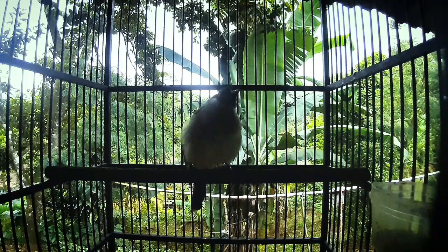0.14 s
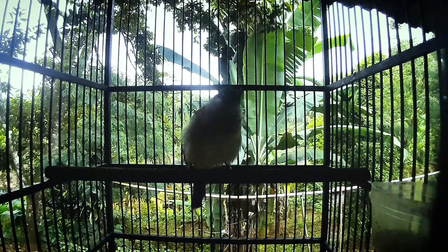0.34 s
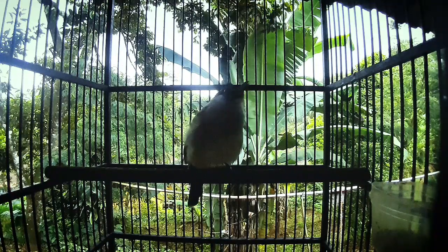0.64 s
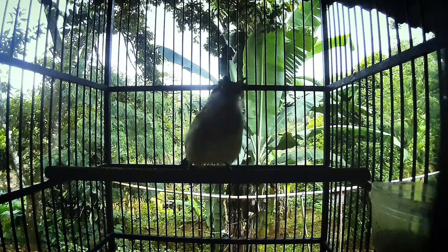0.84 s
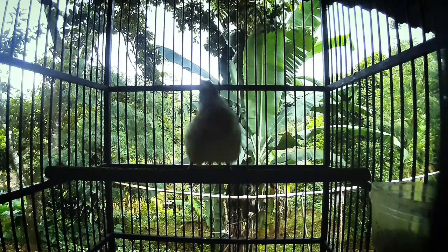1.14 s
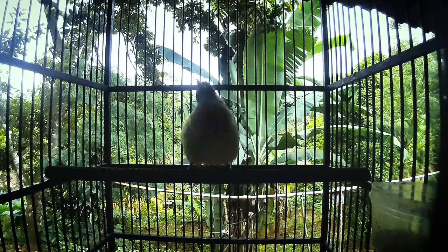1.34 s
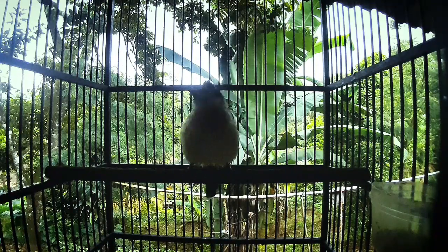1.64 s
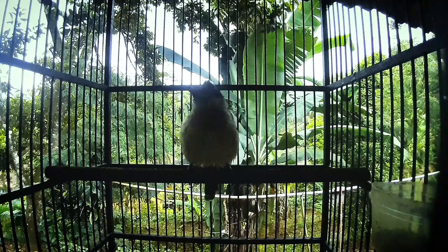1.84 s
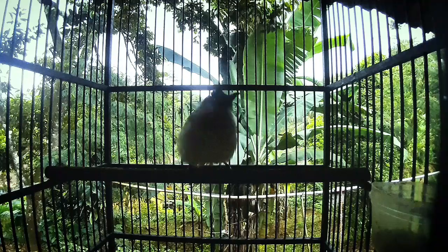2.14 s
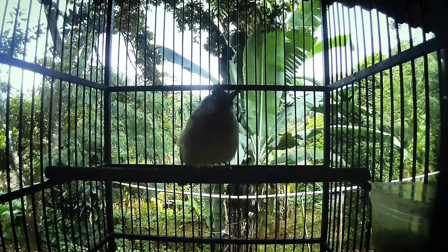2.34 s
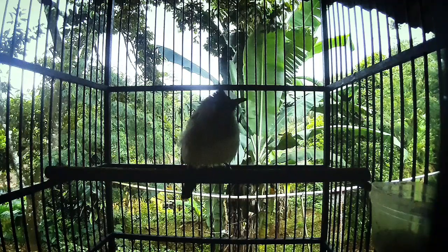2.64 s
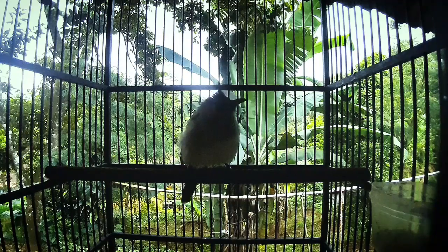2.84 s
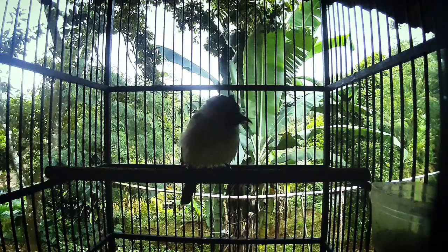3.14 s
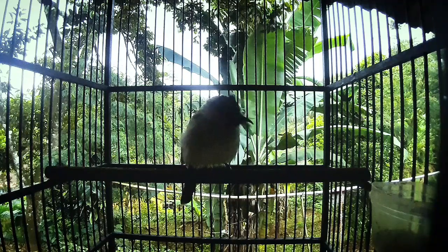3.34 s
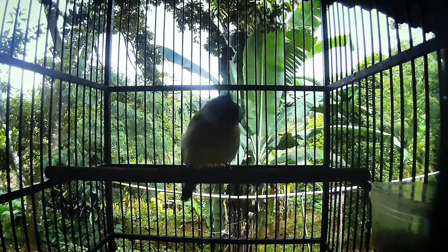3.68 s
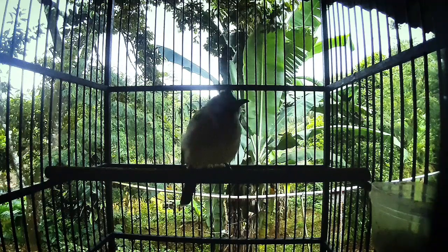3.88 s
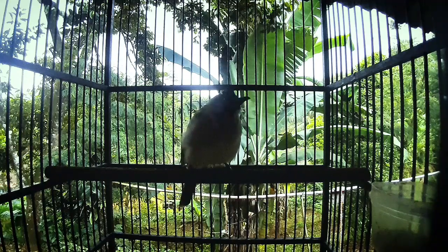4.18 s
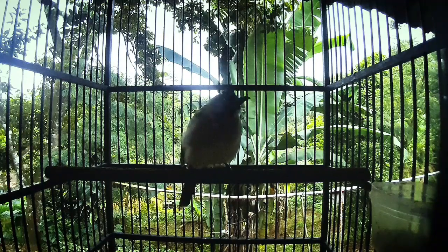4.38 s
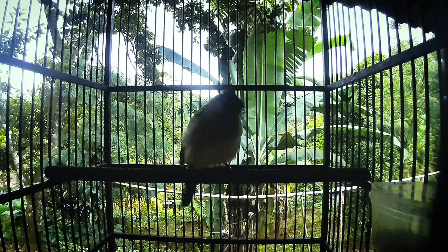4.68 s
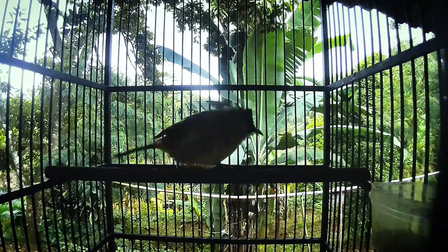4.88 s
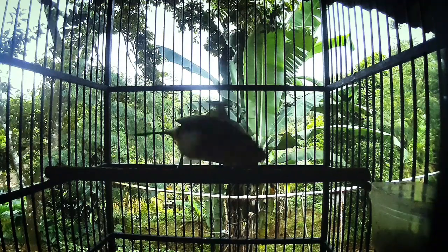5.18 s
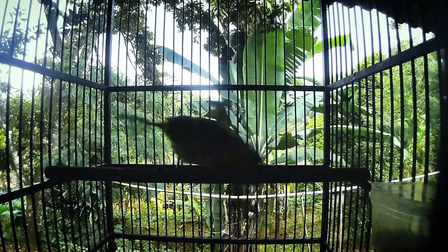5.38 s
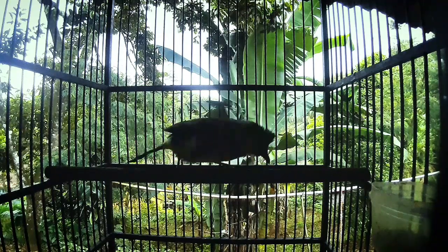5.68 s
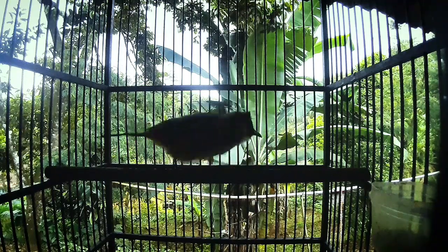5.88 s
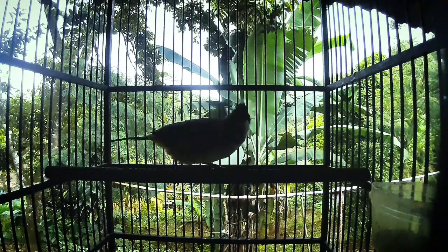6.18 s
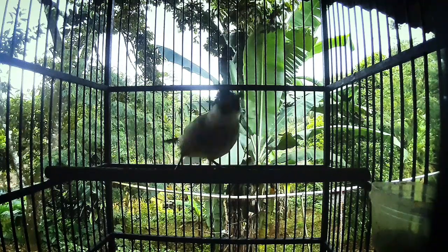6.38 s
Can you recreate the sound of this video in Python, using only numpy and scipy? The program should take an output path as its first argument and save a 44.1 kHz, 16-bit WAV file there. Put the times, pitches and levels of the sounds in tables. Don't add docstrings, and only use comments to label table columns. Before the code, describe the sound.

A caged bird close by gives a buzz and a loud, rich whistled phrase, then hops and claw ticks, as distant birds answer in a hissing garden.

```python
import sys
import numpy as np
from scipy import signal
from scipy.fft import rfft, irfft
from scipy.io import wavfile
from scipy.ndimage import uniform_filter1d

SR = 44100
rng = np.random.default_rng(int(sys.argv[2]) if len(sys.argv) > 2 else 0)


def inscribe(sig):
    pcm = np.round(np.clip(np.atleast_2d(sig).T, -1, 1) * 32767)
    wavfile.write(sys.argv[1], SR, pcm.astype(np.int16))


def how_loud(loudness_db):
    steps = np.asarray(loudness_db, float) / 20
    return 10 ** steps


N = 287532
LEAD = SR // 2
M = N + LEAD


def rms_one(x):
    return x / np.sqrt(np.mean(x ** 2) + 1e-20)


def at_hz(points, hz):
    table_hz, value = np.transpose(points)
    return np.interp(np.log(hz + 1), np.log(table_hz), value)


def drift(rate_hz, size):
    r = np.exp(-2 * np.pi * rate_hz / SR)
    run_in = int(SR / rate_hz)
    noise = rng.standard_normal(size + run_in)
    return rms_one(signal.lfilter([1], [1, -2 * r, r * r], noise)[run_in:])


def resonate(x, hz, width_hz):
    r = np.exp(-np.pi * width_hz / SR)
    poles = [1, -2 * r * np.cos(2 * np.pi * hz / SR), r * r]
    return signal.lfilter([(1 - r * r) / 2, 0, (r * r - 1) / 2], poles, x)


def add(track, piece, start_s):
    i = LEAD + round(start_s * SR)
    track[i:i + len(piece)] += piece[:M - i]


# frequency in Hz, correlation (1 = identical).
STEREO_LIKENESS = [(60, 1), (130, 0.66), (290, .85), (640, 0.19), (1400, 0.012), (15000, 0.043)]


def coloured(spectrum):
    hz = np.fft.rfftfreq(N, 1 / SR)
    mid, side = rfft(rng.standard_normal((2, N))) * how_loud(at_hz(spectrum, hz))
    alike = np.clip(at_hz(STEREO_LIKENESS, hz), -1, 1)
    return rms_one(irfft(np.sqrt(1 + alike) * mid + np.sqrt(1 - alike) * side * [[1], [-1]], N))


def echoes(x, t60_s, build_up_s, damp_hz, direct_db=-60):
    t = np.arange(SR * 3 // 4) / SR
    response = rng.standard_normal((2, len(t))) * how_loud(-60 * t / t60_s) * (1 - np.exp(-t / build_up_s))
    response = signal.sosfilt(signal.butter(1, damp_hz, fs=SR, output="sos"), response)
    response /= np.sqrt(np.sum(response ** 2) / 2)
    response[[0, 1], [0, 13]] += how_loud(direct_db) * np.array([1, .6])
    return signal.fftconvolve(x[None], response, axes=1)[:, LEAD:M]


# frequency in Hz, gain in dB.
LEFT_EAR = [(1000, -2.5), (4200, 2.5), (7400, 4), (8500, -5), (10300, -4.5), (12000, 12), (14500, 3.5),
            (15800, -7)]
RIGHT_EAR = [(1000, -1.5), (2400, -7.5), (2900, -9.5), (3600, -0.5), (5000, -6), (7400, -3.5),
             (8500, -12.5), (10300, -17), (12000, -1), (15800, -11.5)]


def ears(x):
    right_lag_s = 0.00011
    hz = np.fft.rfftfreq(M, 1 / SR)
    left = how_loud(at_hz(LEFT_EAR, hz))
    right = how_loud(at_hz(RIGHT_EAR, hz)) * np.exp(-2j * np.pi * hz * right_lag_s)
    return irfft(rfft(x) * np.array([left, right]), M)[:, LEAD:]


# multiple of the engine's turning rate, level in dB.
ENGINE_ORDERS = [(2, -11.5), (2.94, 9), (4, -11.5), (5, 7.5), (6, 5.5), (7.04, 7.5), (8, -10), (9, -6),
                 (11, -6.5)]


def engine():
    turn_hz = 27.3 * (1 + .004 * drift(.8, N))
    turn = 2 * np.pi * np.cumsum(turn_hz) / SR
    out = np.zeros(N)
    for order, db in ENGINE_ORDERS:
        phase = order * turn + 0.95 * drift(1.1, N) + rng.uniform(0, 2 * np.pi)
        out += how_loud(db + 1.8 * drift(2.0, N)) * np.sqrt(2) * np.sin(phase)
    return out


# frequency in Hz, density in dB per Hz.
RUMBLE_SPECTRUM = [(26, -39.5), (45, -13.5), (70, -7), (187, -3), (213, -10), (240, -14.5), (286, -9),
                   (351, -15.5), (471, -15), (622, -27), (1500, -50), (1950, -77.5), (3300, -120)]


def hum():
    return how_loud(6) * coloured(RUMBLE_SPECTRUM) + how_loud(-3) * engine()


# centre in Hz, width in Hz, level
# in dB, throb rate in Hz.
NARROW_BANDS = [(950, 140, -19.5, 20), (6100, 290, -15, 60), (7280, 610, -9, 100), (10340, 1100, 1, 200)]


def insects():
    out = np.zeros((2, N))
    for hz, width_hz, db, throb_hz in NARROW_BANDS:
        band = resonate(resonate(rng.standard_normal((2, N)), hz, width_hz), hz, width_hz)
        throb_db = 0.5 * drift(throb_hz, N) + 0.75 * drift(3.08, N)
        out += how_loud(db + throb_db) * rms_one(band)
    return out


# frequency in Hz, density in dB per Hz.
AIR_SPECTRUM = [(410, -51), (700, -18), (900, -11.5), (1100, -20), (2500, -23.5), (4100, -24), (6150, -9.5),
                (6740, -12.5), (7390, -7.5), (8420, -27.5), (10300, -0.5), (11600, -23.5), (13300, -45.5),
                (15700, -30)]


def hiss():
    side_phase = np.array([[0], [2.1]])
    whine = how_loud(-3) * np.sin(2 * np.pi * 15626 * np.arange(N) / SR + side_phase)
    return how_loud(1.5) * coloured(AIR_SPECTRUM) + insects() + whine


# time in seconds, level in dB.
GAIN_CURVE = [(0.0, -61.5), (0.36, -62), (0.52, -64), (0.87, -66.5), (0.96, -71.5), (1.12, -72.5),
              (2.9, -74.5), (3.54, -70), (4.01, -65), (4.32, -62), (5.03, -61.5), (5.39, -63), (5.72, -62),
              (6.06, -63), (6.52, -61.5)]


def background():
    s, db = np.transpose(GAIN_CURVE)
    hiss_db = np.interp(np.arange(N) / SR, s, db)
    hum_db = -60 + 1.184 * (hiss_db + 62)
    return (how_loud(hiss_db) * hiss() + how_loud(hum_db) * hum()) * how_loud([[1.3], [-1.3]])


# frequency in Hz, density in dB per Hz.
RUSH_SPECTRUM = [(350, -15.5), (600, -4), (950, 2), (1250, -9.5), (1800, -2), (2600, -15), (4000, -20),
                 (9000, -56)]


def rush():
    peak_s, peak_db, rise_s = 2.067, -57, 0.19
    t = np.arange(N) / SR - peak_s
    rise = np.clip(1 + t / rise_s, 0, 1)
    after_s = t.clip(0)
    fall_db = np.maximum(-70 * after_s, -6.5 - 38 * after_s)
    return rise * how_loud(peak_db + fall_db) * coloured(RUSH_SPECTRUM)


# start in seconds, peak in dB.
BAR_PINGS = [
    (5.15, -50),
    (5.375, -45),
    (5.415, -46),
    (5.76, -43),
    (5.833, -37),
]
# start in seconds, peak in dB, t60 in seconds.
PERCH_KNOCKS = [
    (5.359, -53, .2),
    (5.507, -38, 0.036),
    (5.758, -40.5, 0.15),
    (6.10, -47, .14),
]
# start in seconds, peak in dB, centre in Hz, t60 in seconds.
BEAK_SNAPS = [
    (3.92, -63.5, 13100, .005),
    (4.680, -32.5, 15300, 0.0055),
    (5.282, -35.5, 4052, 0.013),
]
# frequency in Hz, level in dB, t60 in seconds.
PERCH_MODES = [(409.4, -9.5, 0.13), (1400, -15, 0.074), (5140, -9, 0.027)]


def cage():
    out, t = np.zeros(M), np.arange(SR // 5) / SR
    wood = np.zeros(len(t))
    for hz, db, t60_s in PERCH_MODES:
        wood += how_loud(db - 60 * t / t60_s) * np.sin(2 * np.pi * hz * t)
    ticks = [(s, db, 8780, 520, 0.038, 0) for s, db in BAR_PINGS]
    ticks += [(s, db, hz, 5800, t60_s, 0) for s, db, hz, t60_s in BEAK_SNAPS]
    for s, db, t60_s in PERCH_KNOCKS:
        ticks += [(s, db, 1240, 3100, t60_s, 1), (s, db - 10, 646, 400, 3.4 * t60_s, 0)]
    for s, db, hz, width_hz, t60_s, wood_share in ticks:
        burst = rng.standard_normal(len(t)) * how_loud(-60 * t / t60_s)
        crack = resonate(resonate(burst, hz, width_hz), hz, width_hz)
        add(out, how_loud(db) * (crack / np.abs(crack).max() + wood_share * wood), s)
    return ears(out) + how_loud(-9) * echoes(out, .2, .003, 9000)


def syrinx(half_hz, partials_db, flicker_db):
    phase = 2 * np.pi * np.cumsum(half_hz) / SR
    out = np.zeros(len(phase))
    for k, db in enumerate(partials_db, 1):
        level = np.sqrt(2) * how_loud(db + flicker_db * np.log2(k / 2) * drift(57, len(phase)))
        out += level * np.sin(k * phase + k * k) * (k * half_hz < 17000)
    return out


def buzzes(rows, partials_db, swing_hz, rasp, arch, warble_hz, scoop, round_top):
    throat_hz, throat_width_hz = 2020, 300
    out = np.zeros(M)
    for start_s, span_s, centre_hz, db in rows:
        t = np.arange(round(span_s * SR)) / SR
        arc = np.sin(np.pi * t / span_s)
        onset = 1 / (1 + np.exp(-(t - .017) / 0.0016))
        warble = np.sin(2 * np.pi * np.cumsum(warble_hz * (1 + .1 * drift(50, len(t)))) / SR)
        bend = arch * (arc - .6) - scoop * (1 - onset) * (1 - t / 0.028)
        hz = centre_hz * (1 + bend) + swing_hz * (onset * warble + rasp * drift(377, len(t)))
        strength = arc ** round_top * how_loud(12 * rasp * np.tanh(drift(300, len(t))) + 0.87 * onset)
        strength *= how_loud(-4 * np.minimum(((hz - throat_hz) / throat_width_hz) ** 2, 2))
        add(out, how_loud(db) * strength * syrinx(hz, partials_db, flicker_db=-0.46), start_s)
    return out


def whistle(track, rows, partials_db, waver):
    s, hz, db = np.transpose(rows)
    t = s[0] + np.arange(round((s[-1] - s[0]) * SR)) / SR
    hz = uniform_filter1d(np.interp(t, s, hz), size=60) * (1 + waver * drift(38, len(t)))
    strength = uniform_filter1d(np.interp(t, s, how_loud(db)), size=60, mode="constant")
    edge_s = .003
    edge = np.clip(np.minimum(t - s[0], s[-1] - t) / edge_s, 0, 1)
    strength *= np.sin(np.pi / 2 * edge) ** 2
    breath = how_loud(-53.5) * rms_one(resonate(rng.standard_normal(len(t)), 1210, 1500))
    note = syrinx(hz / 2, [-200, partials_db[1]], flicker_db=0)
    overtones = syrinx(hz / 2, partials_db, flicker_db=2.2) - note
    pressed = (strength / strength.max()) ** 0.2
    add(track, strength * (note + pressed * overtones + breath), s[0])


def slide(track, start_s, span_s, first_hz, goal_hz, glide_s, db):
    size = round(span_s * SR) + 1
    t = np.arange(size) / SR
    hz = goal_hz + (first_hz - goal_hz) * np.exp(-t / glide_s)
    hz = uniform_filter1d(hz, size=90) * (1 + 0.013 * drift(49, size))
    place = np.clip(t / span_s, 0, 1) ** (np.log(.5) / np.log(.45))
    strength = how_loud(db) * np.abs(np.sin(np.pi * place)) ** 0.37
    add(track, strength * syrinx(hz / 2, [-70, 0], flicker_db=1.4), start_s)


# start in seconds, peak in dB.
FAR_PIPS = [
    (0.312, -64),
    (2.441, -72),
    (3.494, -75),
    (4.559, -62.5),
]
# start in seconds, length in seconds, first pitch in Hz, peak in dB.
FAR_FALLS = [
    (3.055, 0.13, 4160, -74),
    (3.456, 0.14, 4615, -69.5),
    (3.852, 0.15, 4650, -64.5),
    (4.242, 0.14, 4806, -58.5),
]
# start in seconds, length in seconds, first pitch in Hz, peak in dB.
FAR_HOLDS = [
    (-.1, 0.65, 1482, -73),
    (3.016, .13, 2290, -85),
    (3.09, 0.15, 1600, -81.5),
    (5.028, .04, 5560, -61),
]


def far_slides():
    track = np.zeros(M)
    for s, db in FAR_PIPS:
        slide(track, s, .02, 6080, 4937, .04, db)
    for s, span_s, hz, db in FAR_FALLS:
        slide(track, s, span_s, hz, 1910, 0.97 * span_s, db)
    for s, span_s, hz, db in FAR_HOLDS:
        slide(track, s, span_s, hz, hz * (1 - 0.24 * span_s), span_s / 2, db)
    return echoes(track, .55, .004, 8000, direct_db=-8)


# start in seconds, length in seconds, centre in Hz, peak in dB.
SCOLD_CALLS = [
    (1.295, 0.062, 1945, -68),
    (1.425, 0.054, 1890, -65),
    (1.585, 0.074, 1990, -65),
    (1.775, 0.076, 2010, -65),
    (5.58, 0.067, 2200, -54),
    (5.885, 0.067, 2150, -51.5),
    (6.12, 0.081, 2212, -51.5),
]
SCOLD_STACK = [-16.5, 1, -5, -16, -5, -23, -15]


def far_scolds():
    scolds = buzzes(SCOLD_CALLS, SCOLD_STACK, swing_hz=255, rasp=0.793, arch=0.03, warble_hz=181.1,
                    scoop=0.0291, round_top=0.067)
    return echoes(scolds, 0.36, 0.00044, 4700)


# time from its start in seconds, pitch in Hz, effort in dB.
FAR_FIGURE = [(0, 3510, -16), (.025, 3317, -9.5), (.047, 3280, 5), (.058, 2900, -23), (.07, 2280, -7.5),
              (.09, 2280, -21)]
# start in seconds, time stretch, last note in Hz, level in dB.
FAR_ANSWERS = [
    (-.16, 0.99, 3022, -37),
    (1.985, 1, 3032, -42.5),
    (3.16, 0.99, 2984, -43),
    (4.879, 0.87, 2800, -33.5),
    (5.779, .91, 2860, -32.5),
]
# start in seconds, length in seconds, centre in Hz, peak in dB.
FAR_BUZZ_CALLS = [
    (1.80, 0.09, 2223, -66),
    (2.98, 0.076, 2124, -67),
    (4.695, 0.081, 2080, -50.5),
    (5.58, 0.099, 2050, -48),
]


def far_answers():
    track = np.zeros(M)
    last_db, rise = -3, 0.0551
    up_s = FAR_FIGURE[-1][0] + .028
    for s, stretch, last_hz, db in FAR_ANSWERS:
        last_note = [(up_s, last_hz * (1 - rise), last_db),
                     (up_s + 0.0603, last_hz * (1 + rise), last_db - 7.5)]
        figure = list(FAR_FIGURE) + last_note
        rows = [(s + a * stretch, hz, effort_db + db) for a, hz, effort_db in figure]
        whistle(track, rows, [-46.5, -2.0, -74, -30], waver=.014)
    track += buzzes(FAR_BUZZ_CALLS, [-30, 6, -34, -20], swing_hz=85, rasp=.3, arch=.08, warble_hz=165.7,
                    scoop=0.06, round_top=1.3)
    return echoes(track, 0.63, 0.002, 8600, direct_db=-4.0) * how_loud([[1.9], [-1.9]])


WHISTLE_STACK = [-47.5, -0.5, -44, -32.5, -55, -39, -59, -33.5, -56, -31.5, -53.5, -44]
BUZZ_STACK = [-13.5, 1, -29, -28.5, -43.5, -52, -41.5, -46]
# start in seconds, length in seconds, centre in Hz, peak in dB.
OPENING_BUZZ = [
    (.436, 0.086, 2049, -14.5),
]
# time in seconds, pitch in Hz, effort in dB.
NOTE_STEP_DOWN = [(.688, 2970, -51.5), (.697, 3216, -24), (.7045, 3290, -15), (.7075, 2870, -14),
                  (.714, 2975, -10.5), (.722, 2924, -8.5), (.729, 3070, -22.5), (.732, 2700, -19.5)]
NOTE_LOW_HOLD = [(.732, 2990, -22.5), (.737, 2320, -19.5), (.745, 2426, -19), (.755, 2375, -11.5),
                 (.762, 2548, -9.5), (.768, 2540, -14.5), (.775, 2517, -14), (.787, 2420, -36.5)]
NOTE_WHIP = [(.830, 2206, -45.5), (.835, 2850, -12.5), (.838, 3494, -18.5), (.842, 3065, -7.5),
             (.850, 2955, -10.5), (.860, 2970, -12.5), (.868, 2931, -34)]
NOTE_HIGH_WHIP = [(.884, 2610, -45), (.892, 3440, -12.5), (.895, 3850, -17), (.899, 3850, -6),
                  (.904, 3630, -7.5), (.912, 3553, -5.5), (.937, 3570, -8), (.943, 3600, -13),
                  (.950, 3440, -43.5)]
NOTE_ARCH = [(1.013, 2880, -48.5), (1.022, 3135, -14), (1.032, 3205, -7.5), (1.044, 3220, -8),
             (1.050, 3150, -10), (1.055, 3320, -18.5), (1.063, 2700, -10.5), (1.072, 2610, -18)]
NOTE_DIP = [(1.072, 2530, -17), (1.083, 2475, -12), (1.089, 2390, -16.5), (1.092, 2410, -23),
            (1.099, 2173, -14), (1.106, 2450, -20.5), (1.115, 2460, -36)]
NOTE_SWELL = [(1.115, 2500, -36.5), (1.128, 2640, -23), (1.142, 2644, -9.5), (1.158, 2760, -10),
              (1.168, 2802, -13.5), (1.174, 2697, -14.5), (1.181, 2760, -43)]


def bulbul():
    voice = buzzes(OPENING_BUZZ, BUZZ_STACK, swing_hz=280, rasp=0.38, arch=.01, warble_hz=184.8,
                   scoop=.4, round_top=0.75)
    breaths = [NOTE_STEP_DOWN + NOTE_LOW_HOLD, NOTE_WHIP, NOTE_HIGH_WHIP, NOTE_ARCH + NOTE_DIP + NOTE_SWELL]
    for breath in breaths:
        whistle(voice, breath, WHISTLE_STACK, waver=.001)
    quick = how_loud(-22) * echoes(voice, .08, .002, 7000)
    tail = how_loud(-33.5) * echoes(voice, 0.48, 0.013, 5000)
    return ears(voice) + quick + tail


def scene():
    far_birds = far_slides() + far_scolds() + far_answers()
    return background() + rush() + cage() + far_birds + bulbul()


def top_cut(x):
    return signal.sosfilt(signal.butter(12, 16510, fs=SR, output="sos"), x)


def record(dry):
    low_pass = signal.ellip(10, .5, 60, 15850, fs=SR, output="sos")
    mix = signal.sosfilt(low_pass, dry)
    return top_cut(mix)


dry = scene()
out = record(dry)
inscribe(out)
```